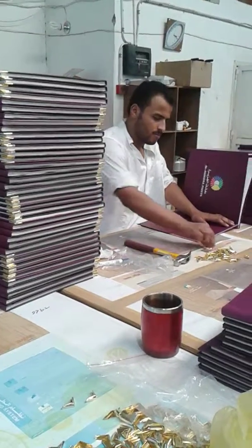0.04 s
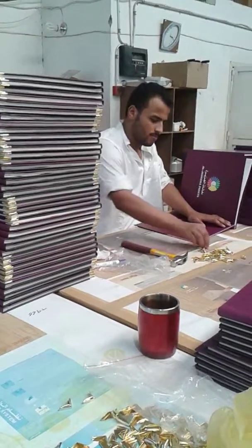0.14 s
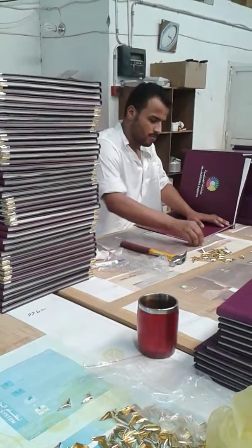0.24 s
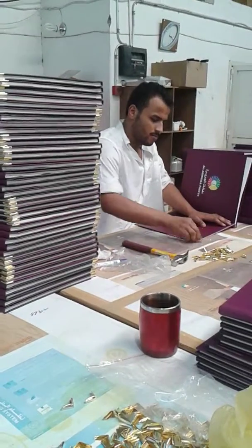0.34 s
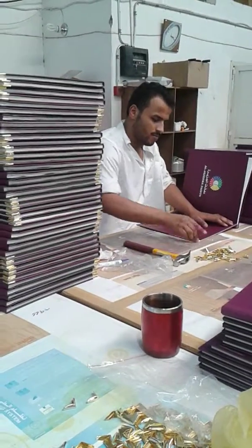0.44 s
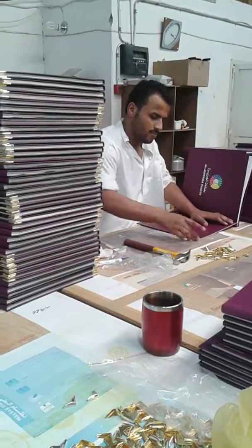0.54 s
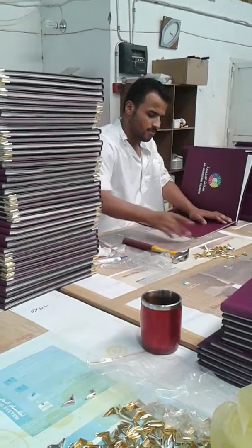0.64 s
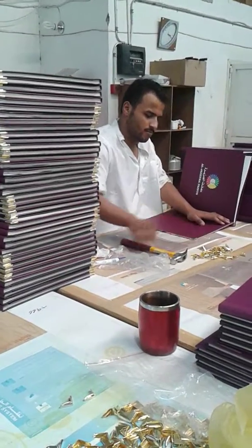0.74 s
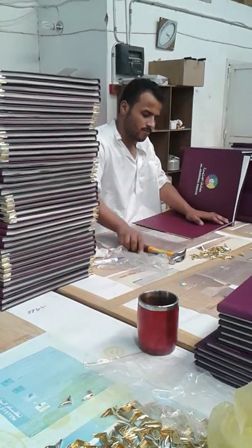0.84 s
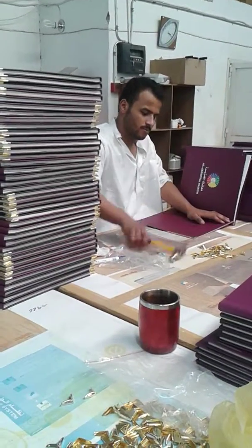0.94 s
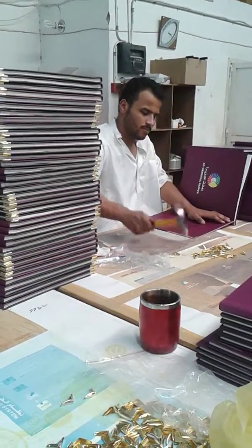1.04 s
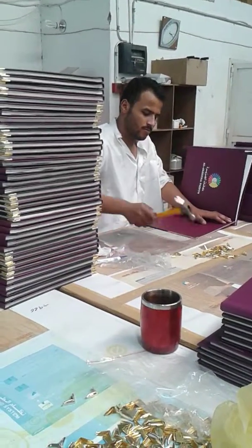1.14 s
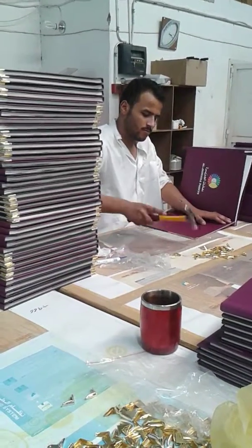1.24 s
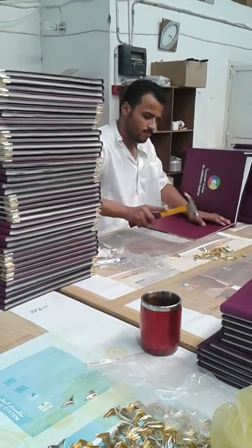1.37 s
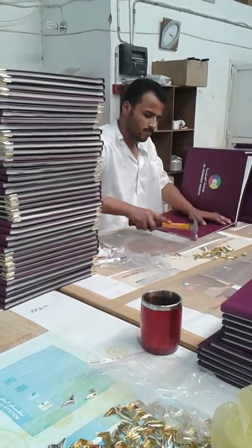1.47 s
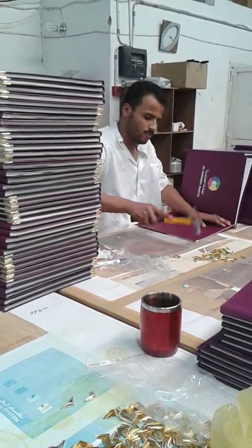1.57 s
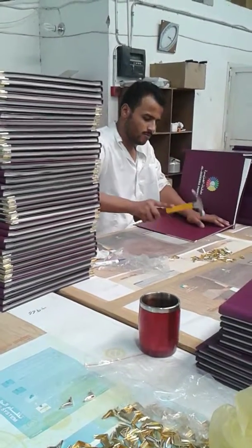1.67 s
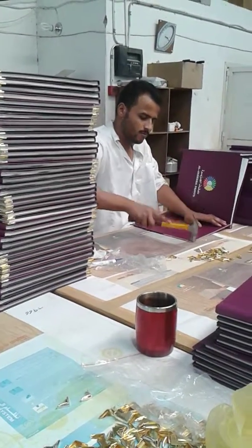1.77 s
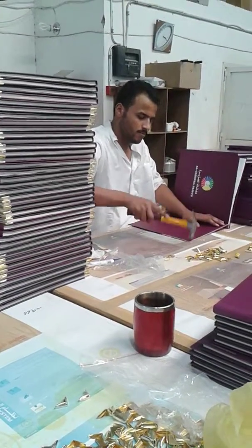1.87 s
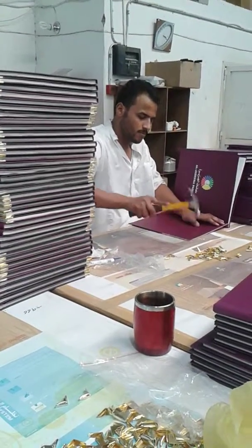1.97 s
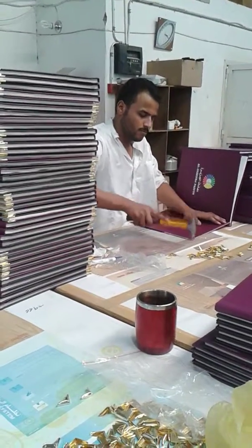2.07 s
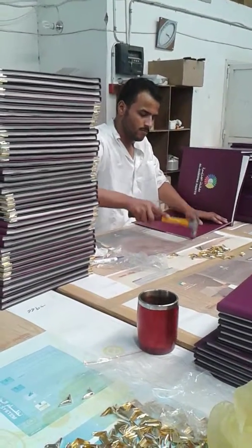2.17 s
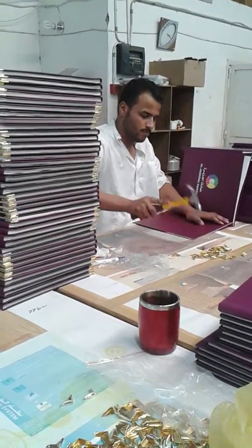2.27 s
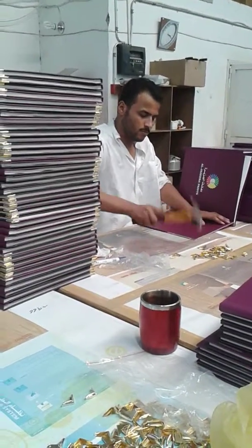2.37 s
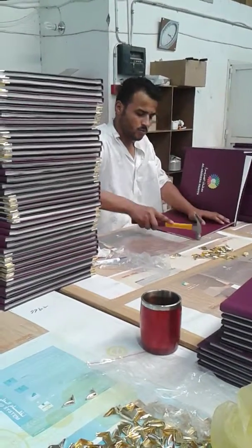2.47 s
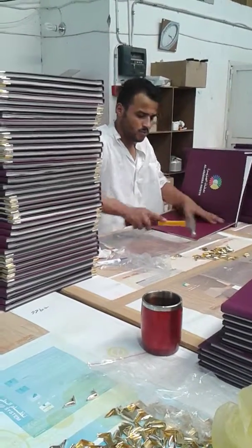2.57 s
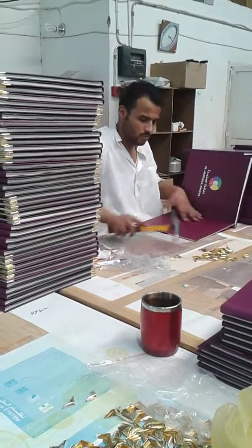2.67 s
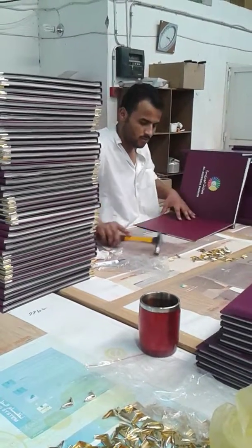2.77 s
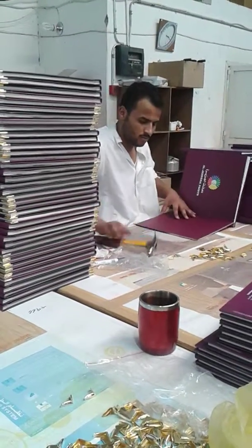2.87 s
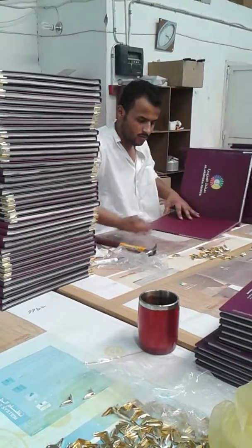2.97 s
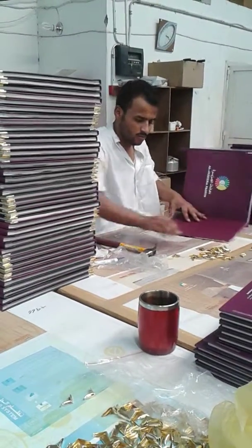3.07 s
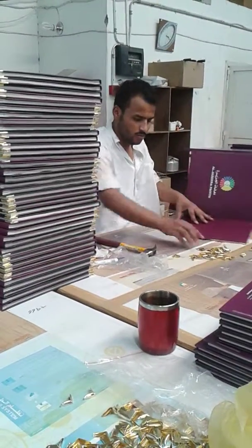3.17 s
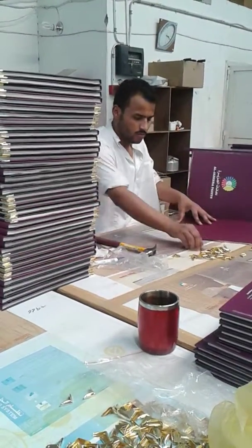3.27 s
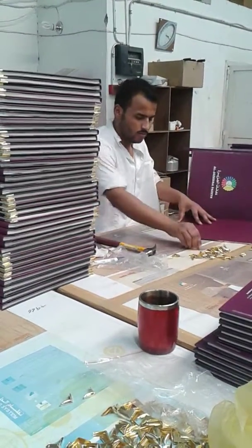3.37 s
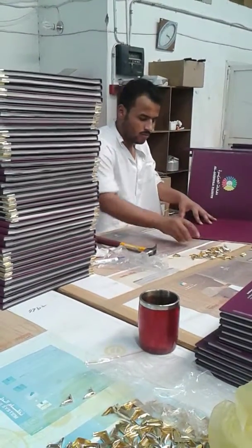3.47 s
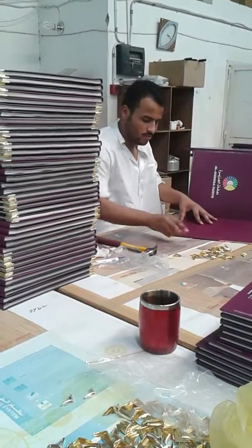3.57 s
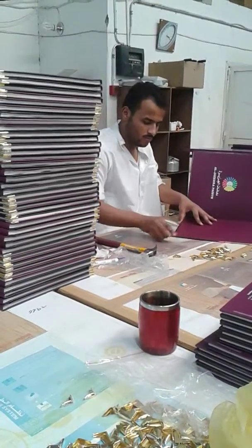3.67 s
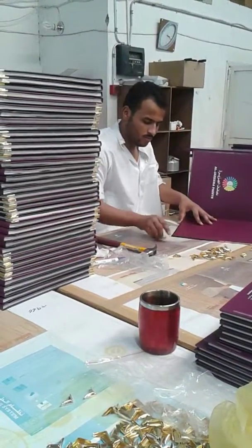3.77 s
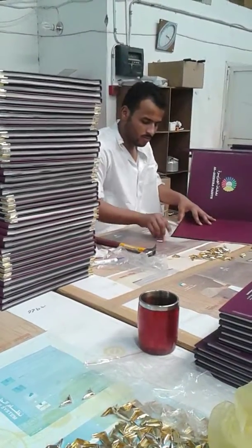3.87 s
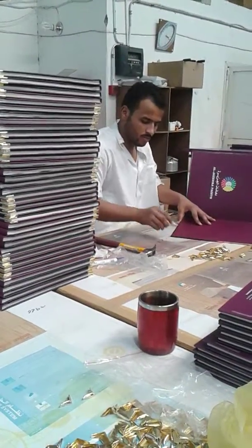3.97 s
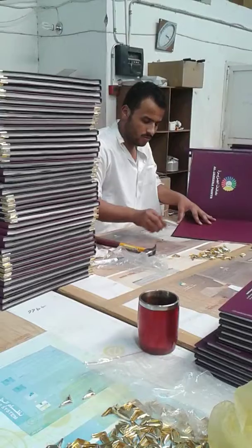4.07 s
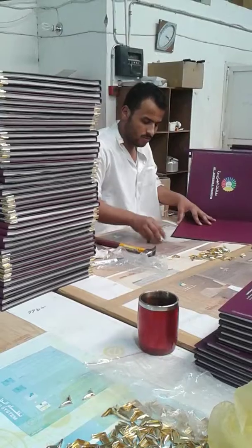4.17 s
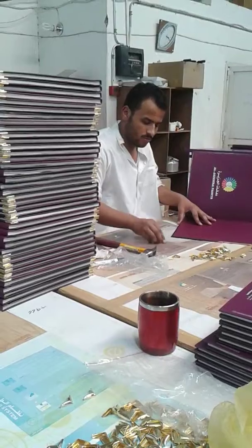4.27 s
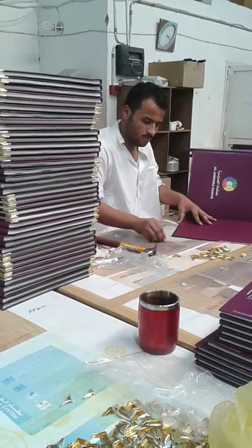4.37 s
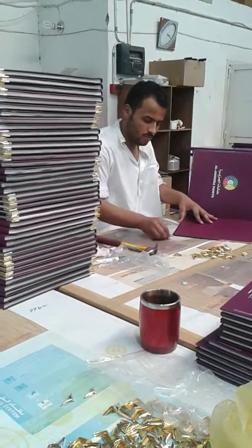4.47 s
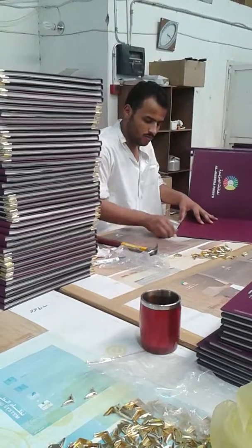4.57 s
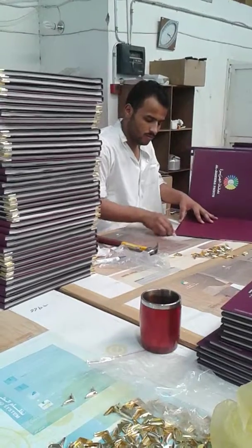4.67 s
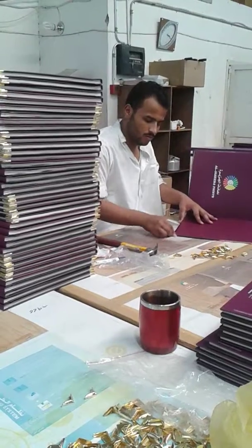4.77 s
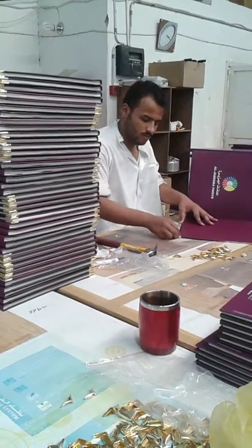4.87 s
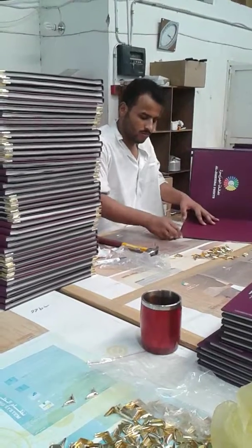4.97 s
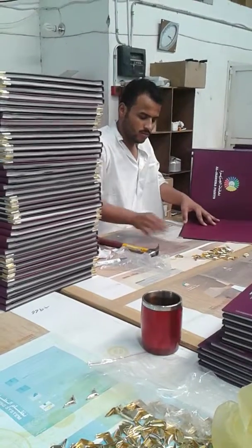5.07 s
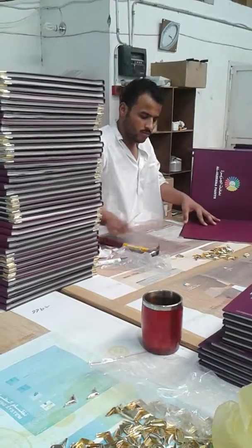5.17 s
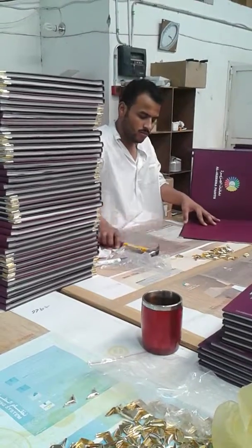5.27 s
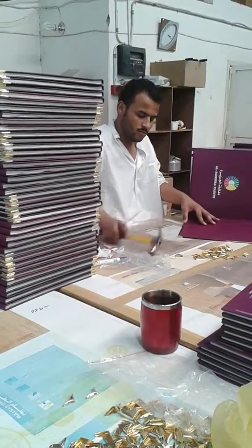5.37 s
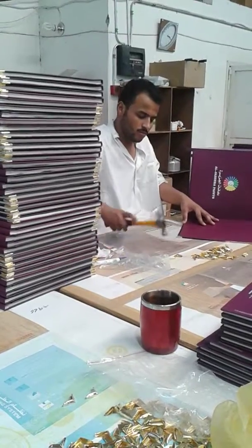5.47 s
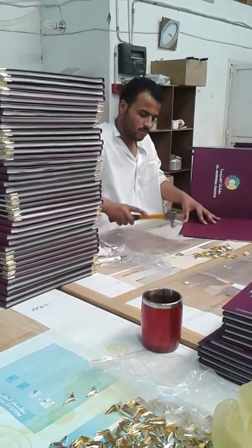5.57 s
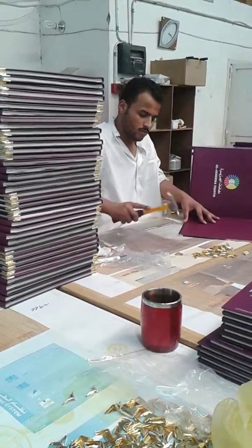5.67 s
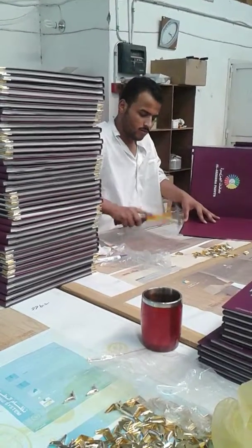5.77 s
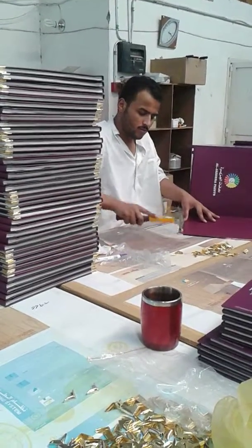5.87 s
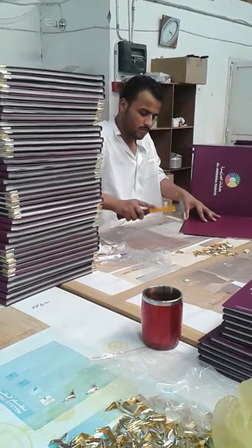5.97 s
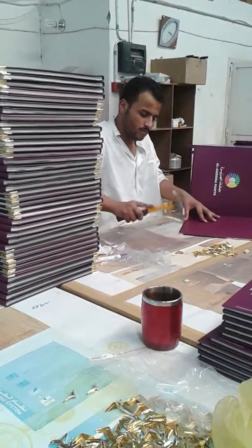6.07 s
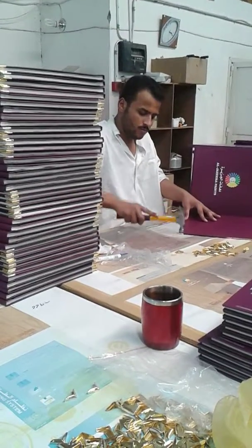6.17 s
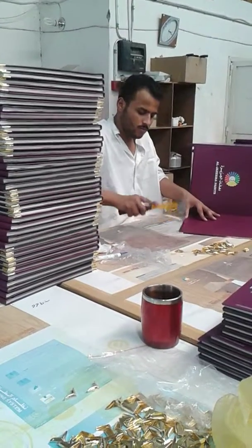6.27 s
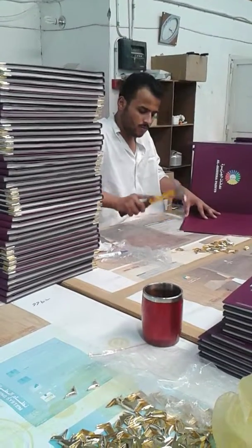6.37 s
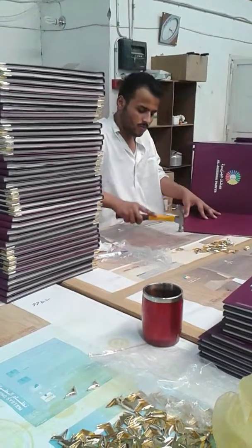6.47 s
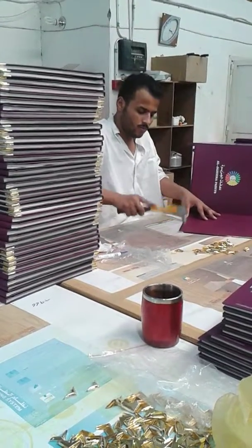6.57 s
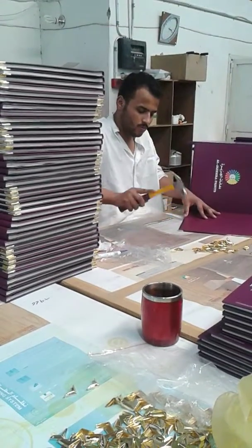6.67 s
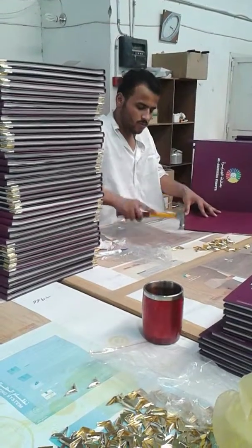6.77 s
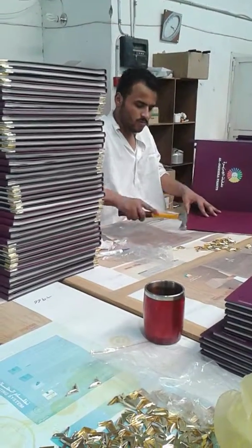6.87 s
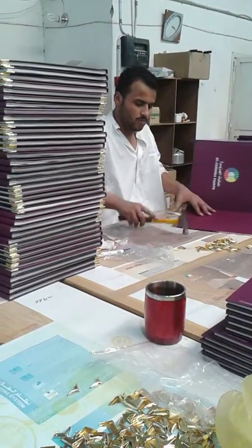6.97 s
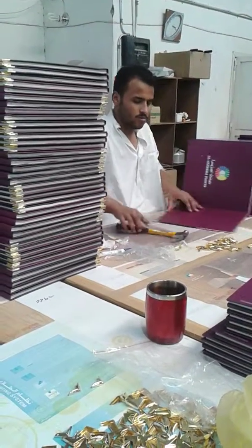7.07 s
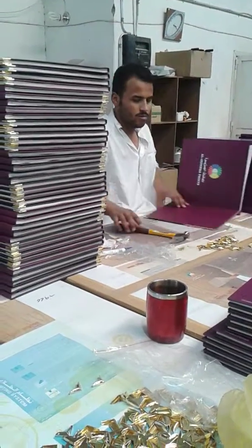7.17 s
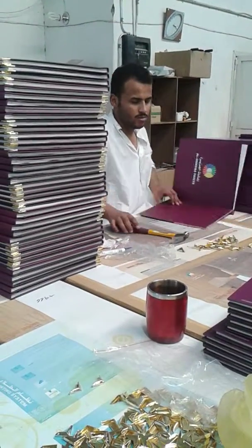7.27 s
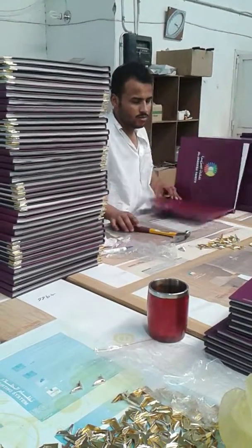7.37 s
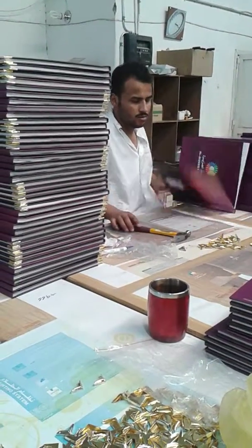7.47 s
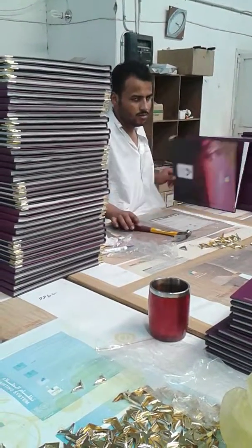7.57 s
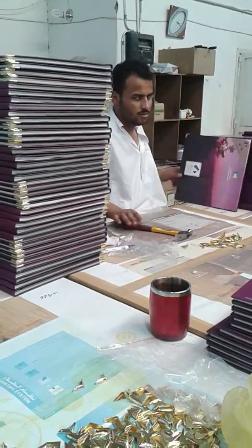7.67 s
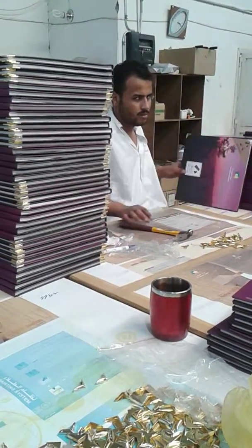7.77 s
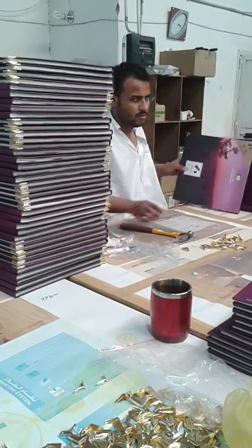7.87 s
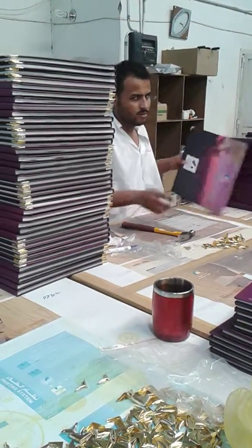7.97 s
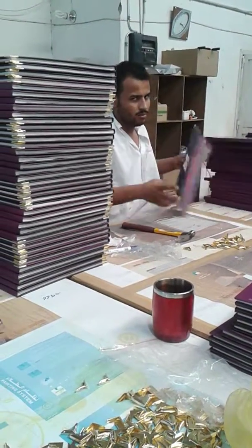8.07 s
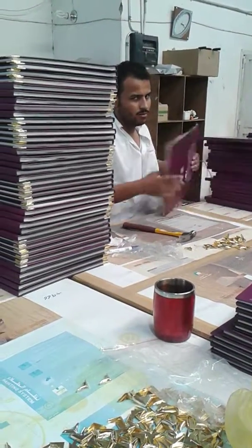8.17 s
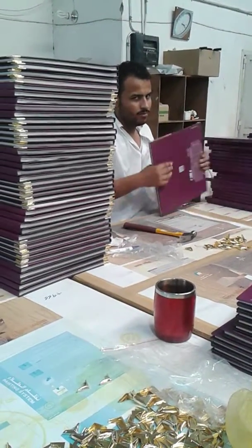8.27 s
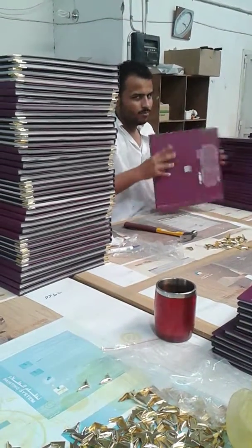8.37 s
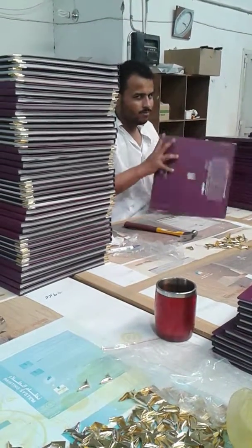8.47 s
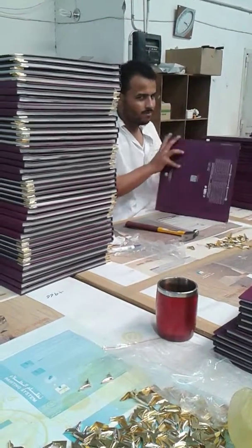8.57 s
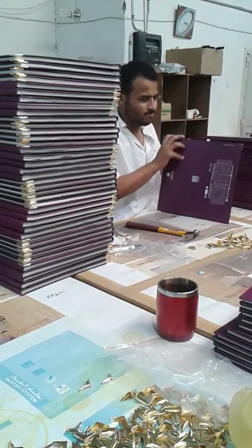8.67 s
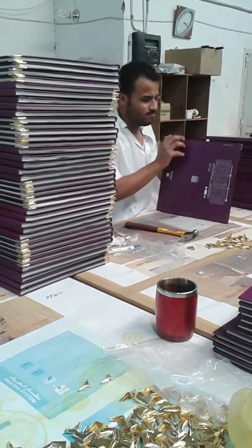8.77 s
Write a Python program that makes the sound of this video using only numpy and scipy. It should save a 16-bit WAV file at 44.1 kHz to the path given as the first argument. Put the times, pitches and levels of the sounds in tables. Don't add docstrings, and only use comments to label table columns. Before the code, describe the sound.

A tool is picked up with a clack and paper rustle, then hammer blows start lightly and get denser as a second hammer joins, with steel cracks, bouncing taps and jingling small metal pieces. A lull leaves whine, hiss and ticking. A second run hits harder, then blows on a thicker, drier pile and sliding card. Live room, close microphone, slightly clipped peaks.

```python
import sys
import numpy as np
from scipy import signal
from scipy.fft import rfft, irfft, next_fast_len
from scipy.io import wavfile
from scipy.ndimage import uniform_filter1d, map_coordinates

SR = 44100
rng = np.random.default_rng(int(sys.argv[2]) if len(sys.argv) > 2 else 0)


def log_audio(samples):
    frames = np.atleast_2d(samples).T
    limited = np.clip(frames, -1, 1)
    pcm = np.round(limited * 32767).astype(np.int16)
    wavfile.write(sys.argv[1], SR, pcm)


def linear_from_db(decibels):
    return 10 ** (np.asarray(decibels, float) / 20)


N = 389403


def unit(x):
    return x / np.sqrt(np.mean(x ** 2) + 1e-20)


def along(points, hz):
    f, v = np.transpose(points)
    return np.interp(np.log(hz + 1), np.log(f + 1), v)


def wobble(rate, size=N):
    return map_coordinates(rng.standard_normal(int(size * rate / SR) + 4), [np.arange(size) * rate / SR])


def filtered(x, response):
    m = next_fast_len(x.shape[-1] + 8192)
    return irfft(rfft(x, m) * response(np.fft.rfftfreq(m, 1 / SR)), m)[..., :x.shape[-1]]


def coloured(x, spectrum):
    return unit(filtered(x, lambda hz: linear_from_db(along(spectrum, hz))))


def resonance(hz, width):
    return lambda f: 1j * f * width / (hz * hz - f * f + 1j * f * width)


def ring(t, hz, db, t60, rise):
    hz, db, t60 = (np.reshape(v, (-1, 1)) for v in (hz, db, t60))
    modes = linear_from_db(db - 60 * t / t60) * np.sin(2 * np.pi * hz * t)
    return np.sum(modes, axis=0) * (1 - np.exp(-t / rise))


def add(track, s, sound):
    track[round(s * SR):][:len(sound)] += sound


# (time [s], slap level [dB], board pitch [Hz],
# lasting boom re slap [dB], steel crack level [dB])
NEAR_BLOWS = [
    (1.533, -3.5, 1110, -9, -38),
    (1.854, -2, 1020, -3, -33),
    (2.153, 4, 1000, -13.5, -16),
    (2.469, 3.5, 1000, -9.5, -9.5),
    (5.864, -1.5, 1007, -10.5, -24),
    (6.19, -1.5, 1132, -16, -27),
    (6.503, 6.5, 813, -18.5, -3.5),
    (6.835, 9, 809, -24, 1),
]
BESIDE_BLOWS = [
    (2.408, -1.5, 922, -6.5, -27),
    (2.786, 5, 932, -13, -1.5),
    (3.107, 5, 934, -8.5, -15),
    (3.453, 7.5, 795, -15.5, -5),
    (3.899, 8, 882, -14.5, 1),
    (4.1, -3, 1230, -10, -7.5),
]
LAID_DOWN = [
    (2.989, -9, 876, -1.5, -19),
    (7.121, -3, 798, -11, -8),
]
PILE_BLOWS = [
    (7.345, 2.5, 1200, -9.5, -9),
    (7.741, 7.5, 970, -14.5, -1),
    (8.499, 5, 1226, -14.5, -2.5),
]


def blows():
    # thud, belly near 400 Hz and board knock [dB re slap]; folders land after [s],
    # damping on landing [dB], room share [dB]; then the level of loose corners thrown up [dB]
    kinds = [(NEAR_BLOWS, (-15.5, -5.5, -11.5, 0.6, -7.5, -2.5), -36.5),
             (BESIDE_BLOWS, (-12, -3.5, -9, 0.062, -11.5, -8), -30),
             (LAID_DOWN, (-28, 1, 0, 2.5, -3, -5), -57),
             (PILE_BLOWS, (-21, -2, -10.5, -0.2, -2.5, -11), -30.5)]
    return sorted((row, place, rattle_db) for rows, place, rattle_db in kinds for row in rows)


# (frequency [Hz], level [dB], t60 [s])
TABLE_AND_STACK_MODES = [(107, -52, 0.36), (126.7, -4.5, 0.76), (156, -7, 0.49), (216.7, -7, 0.37), (258, 6.5, 0.12),
                         (334, 9.5, 0.13), (403.3, 9, 0.093), (434, 0.5, 0.11), (466.7, 1.5, 0.36), (527, 1.5, 0.36),
                         (649.6, 1, 0.47), (776, 8, 0.11), (797.5, -4.5, 0.28), (813, -7, 0.39), (1000, 16, 0.2),
               (1084, 16.5, 0.18), (1200, -25, 0.17), (1200, -1, 0.24), (1579, -17, 0.044),
               (2000, -36, 0.079)]
# (frequency [Hz], density [dB per Hz])
CHATTER_SPECTRUM = [(150, -40), (350, 13.5), (700, 5), (1300, 3), (2200, -10), (4000, -51)]
CHATTER_DB, CHATTER_PER_SLAP, CHATTER_PER_CRACK = -17, 0.26, 0.26
BOARD_YIELDS = 0.1
BEND_S = 0.0015
RETURN_DB = -6.5


def hammers():
    out, t = np.zeros(N + 2 * SR), np.arange(SR // 3) / SR
    hz, level, t60 = np.transpose(TABLE_AND_STACK_MODES)
    for (s, db, board_hz, boom_db, crack_db), place, _ in blows():
        thud_db, belly_db, board_db, lands, damp_db, room_db = place
        chatter_db = CHATTER_DB + CHATTER_PER_SLAP * db + CHATTER_PER_CRACK * crack_db
        board_db = board_db - BOARD_YIELDS * db
        landed = linear_from_db(damp_db / (1 + np.exp((lands - t) / 0.0015)))
        colour = along([(120, thud_db), (280, -2.5), (400, belly_db), (560, -7.5), (1000, board_db - 10.5)], hz)
        level_here = level + colour

        spot = rng.normal(0, 1, (3, len(hz)))
        boom_level = level_here + 3 * spot[0] + boom_db + 1.0 - 9 * (hz > 600) - 4 * (hz > 440)
        boom = ring(t, hz * (1 + 0.012 * spot[1]), boom_level, t60, rise=0.0019)
        slap = ring(t, hz * 1.048, level_here + 4 * spot[2], 0.18 * t60, rise=0.0011)
        knock_hz = board_hz * np.array([.72, 1, 1.28, 1.65, 2.2])
        knock_db = board_db + np.array([1.5, 8, 4.0, 5, 0])
        knock = ring(t, knock_hz, knock_db, [0.024, 0.04, 0.029, 0.016, 0.017], rise=0.00037)

        grains = rng.standard_normal(len(t)) * linear_from_db(3.5 * wobble(70, size=len(t)))
        chatter = coloured(grains, CHATTER_SPECTRUM) * linear_from_db(chatter_db + 5 - 60 * t / 0.46)
        chatter *= 1 - np.exp(-t / 0.0005)
        blow = linear_from_db(db - 0.5) * (boom * landed + slap + knock) + chatter * landed
        blow = filtered(blow, lambda f: np.exp(-4j * np.pi * BEND_S * np.sqrt(1000 * f)))
        add(out, s - .0005, blow)
        wet = room(blow)
        add(out, s, linear_from_db(room_db + RETURN_DB) * wet * np.linalg.norm(blow) / np.linalg.norm(wet))
    return out[:N]


# (frequency [Hz], width [Hz], level [dB])
CORNER_RESONANCES = [(2220, 1400, -2), (4000, 310, 14), (5070, 750, 8.5), (8200, 930, 1), (10000, 920, 0.5),
                     (12400, 1000, 0.5), (14200, 1300, 0.5)]
RATTLE_GROWS = 0.31
RATTLE_AFTER_S, LONGER_S = 0.051, 0.0022


def steel():
    out, effort, t = np.zeros(N + 2 * SR), np.zeros(N + SR), np.arange(SR // 4) / SR
    for (s, db, *_, crack_db), _, rattle_db in blows():
        grit = uniform_filter1d(rng.standard_normal(len(t)), size=7) * linear_from_db(-60 * t / 0.027 + 20.5)
        grit *= 1 - np.exp(-t / 0.0014)
        clink = ring(t, [2500, 3900, 5600], [-4, 0, -10], [.025, .015, .01], rise=0.00032)
        crack = linear_from_db(crack_db - 10) * (clink + grit)
        add(out, s, crack)
        add(out, s, room(crack))

        flight = t / (RATTLE_AFTER_S + LONGER_S * db)
        landing = flight ** 2.45 * np.exp(3.6 * (1 - flight))
        add(effort, s, linear_from_db(rattle_db + RATTLE_GROWS * db) * landing)
    grains = rng.standard_normal(N) * linear_from_db(1.5 * wobble(300))

    def metal(f):
        return sum((-1) ** k * linear_from_db(db) * resonance(hz, width)(f)
                   for k, (hz, width, db) in enumerate(CORNER_RESONANCES))

    return out[:N] + effort[:N] * unit(filtered(grains, metal))


# (time [s], peak level [dB], board pitch [Hz])
HEAD_REBOUNDS = [
    (1.936, -6.5, 1190),
    (2.257, 2, 1010),
    (2.551, -2, 1210),
    (3.03, -11, 1274),
    (5.964, 4.5, 1240),
    (6.288, 6, 1200),
    (6.638, 11.5, 1233),
    (6.978, 12, 1200),
    (6.985, 1.5, 1145),
]
REBOUND_TABLE_HZ, REBOUND_TABLE_DB = 382, -12
# (time [s], peak level [dB], board pitch [Hz], table pitch [Hz], table re peak [dB])
FOLDER_LANDINGS = [(1.577, -6.5, 660, 268, 5.5), (1.605, -7.5, 1180, 233, 3), (2.828, -1, 897, 334, 5.5),
                   (2.89, -18, 590, 358, 9), (3.151, -2, 614, 444, -1), (3.497, -3, 670, 472, -3),
                   (3.635, -17, 666, 468, -1), (4.023, -8, 690, 350, 4), (6.243, -17, 830, 258, 13),
                   (7.169, -2.5, 700, 342, 1.5), (7.779, 0, 644, 345, -9), (7.841, -5, 590, 328, 3),
                   (8.552, -9, 940, 290, 8)]
# (time [s], peak level [dB], board pitch [Hz], table pitch [Hz], table re peak [dB])
HANDLING_KNOCKS = [(0.604, 6, 1030, 173, -20), (0.644, -17, 910, 340, 3.5), (0.679, -3.5, 770, 247, -10),
                   (0.692, -17, 623, 378, 1), (0.721, -19, 1150, 346, -2), (0.727, -34.5, 704, 130, 12),
                   (0.852, -17.5, 760, 338, -1.5), (5.299, -12.5, 675, 370, 2), (5.302, -16, 1050, 360, -3),
                   (7.09, -15, 650, 333, 1), (8.131, -13.5, 820, 249, -1.5), (4.103, 10.5, 1237, 424, -18)]
TAP_T60_S, TAP_SHORTENS, TAP_PITCH_LAW = 0.018, 0.077, 0.69


def taps():
    out, t = np.zeros(N + 2 * SR), np.arange(SR // 5) / SR
    rebounds = [(*row, REBOUND_TABLE_HZ, REBOUND_TABLE_DB) for row in HEAD_REBOUNDS]
    for s, db, note_hz, table_hz, table_db in rebounds + FOLDER_LANDINGS + HANDLING_KNOCKS:
        note_t60 = TAP_T60_S * linear_from_db(-TAP_SHORTENS * db) * (1000 / note_hz) ** TAP_PITCH_LAW
        note = ring(t, note_hz * np.array([.84, 1, 1.14, 1.5]), [-1, 4.5, -3.0, -12], note_t60, rise=0.0041)
        wood_db = table_db + np.array([-9, -1.5, -9])
        wood = ring(t, table_hz * np.array([.8, 1, 1.22]), wood_db, 3.2 * note_t60, rise=0.0029)
        add(out, s, linear_from_db(db) * (note + wood))
        add(out, s, linear_from_db(db + 2) * room(note + wood))
    return out[:N]


# (time [s], peak level [dB], pitch [Hz])
CORNER_CLICKS = [
    (2.437, -13, 3930),
    (2.4965, -37, 3960),
    (5.9434, -11, 3080),
    (5.955, -18, 3700),
    (6.982, -18, 3370),
    (7.3861, -14, 4700),
    (7.7955, -7, 3600),
    (8.129, -16, 3200),
]
TICK_FIRST_S, TICK_EVERY_S = 0.0957, 0.86665
TICK_DB, TICK_HZ = -20, 3670


def clicks():
    out, t = np.zeros(N + SR), np.arange(SR // 20) / SR
    ticks = [(s, TICK_DB, TICK_HZ) for s in np.arange(TICK_FIRST_S, N / SR, TICK_EVERY_S)]
    for s, db, hz in CORNER_CLICKS + ticks:
        spit = rng.standard_normal(len(t)) * linear_from_db(-60 * t / 0.046) * (1 - np.exp(-t / 0.0013))
        tone = filtered(spit, lambda f: resonance(hz, .45 * hz)(f) + linear_from_db(-32) * resonance(12500, 5000)(f))
        add(out, s, linear_from_db(db - 0.5) * tone / np.abs(tone).max())
    return out[:N]


# (time [s], fall t60 [s], level [dB], centre [Hz])
SLIDES = [
    (.62, 0.43, -23, 900),
    (0.659, 0.56, -27, 2800),
    (0.7, 1, -36.5, 600),
    (.75, 0.63, -30, 1500),
    (5.29, 0.46, -30, 4000),
    (7.7, 0.43, -21, 700),
]
# (time [s], level [dB], centre [Hz])
FOLDER_SCUFFS = [
    (1.836, -22, 597),
    (3.88, -11.5, 493),
    (4.085, -12, 700),
    (8.13, -22, 604),
]
SLIDE_RISE_S, SCUFF_RISE_S, SCUFF_T60_S = 0.027, 0.0045, 0.11


def rustle():
    out, t = np.zeros(N + SR), np.arange(SR // 2) / SR
    strokes = [(SLIDE_RISE_S, *row) for row in SLIDES]
    strokes += [(SCUFF_RISE_S, s, SCUFF_T60_S, db, hz) for s, db, hz in FOLDER_SCUFFS]
    for rise, s, t60, db, hz in strokes:
        grains = rng.standard_normal(len(t)) * linear_from_db(5 * wobble(120, size=len(t)))
        scrape = filtered(grains, lambda f: resonance(hz, hz)(f) ** 2)
        add(out, s, unit(scrape) * linear_from_db(db - 60 * t / t60) * (1 - np.exp(-t / rise)))
    return out[:N]


# (time [s], tooth tone level [dB])
MACHINE_LOAD = [(0, -44), (.7, -44.5), (1.5, -41.5), (2.5, -43.5), (3.5, -38), (4.7, -42), (5.3, -36.5),
                (6.2, -35), (7.4, -37.5), (8, -33), (8.83, -39)]
# (frequency [Hz], peak level [dB])
MACHINE_TONES = [(565.2, -42), (1405, -49.5), (1486, -49), (3009, -55), (3182, -38), (3241, -62),
                 (3302, -47), (3332, -44), (3359, -54), (3451, -41), (3537, -52), (3688, -71), (4156, -48),
                 (5658, -49.5), (6013, -47), (6191, -52), (6277, -47)]
# (frequency [Hz], density [dB per Hz])
AIR_SPECTRUM = [(30, -78), (60, -13), (150, -10), (330, -4.5), (560, -9), (900, -10.5), (1450, -11.5),
                (2300, -15.5), (2900, -5.5), (3600, -2.5), (5300, -14), (6200, -10.5), (7400, -15),
                (15000, -30)]
# (frequency [Hz], density [dB per Hz])
TURN_SPECTRUM = [(2300, -101), (2900, 24.5), (3400, 12.5), (4200, 3), (4900, -38), (5500, -25), (6200, -5),
                 (7500, -18), (9000, -61)]
SHAFT_HZ, TOOTH_HZ = 29.482, 2830.3
HISS_DB, HISS_GROWS = -35, 0.06


def machine():
    s, tooth_db = np.transpose(MACHINE_LOAD)
    hiss_db = HISS_DB + HISS_GROWS * (tooth_db - tooth_db.mean())
    clock = np.arange(N) / SR
    spun = clock + np.cumsum(0.000449 * wobble(1.5)) / SR
    tooth_level = linear_from_db(np.interp(clock, s, tooth_db) + 3.5 + 1.9 * wobble(8))
    tones = tooth_level * np.sin(2 * np.pi * TOOTH_HZ * spun)
    for hz, db in MACHINE_TONES:
        if hz > 2500:
            hz = round(hz / SHAFT_HZ) * SHAFT_HZ
        tones += linear_from_db(db + 0.34 * wobble(16)) * np.sin(2 * np.pi * (hz * spun + rng.random()))

    place = spun * SHAFT_HZ % 1
    pattern = map_coordinates(rng.standard_normal(1500), [place * 1500], mode="grid-wrap")

    z = signal.stft(rng.standard_normal(N), nperseg=512)[2]
    field = uniform_filter1d(rng.standard_normal(z.shape), size=5, axis=0)
    field = uniform_filter1d(field, size=12, axis=1)
    air = signal.istft(z * linear_from_db(1.27 * unit(field)), nperseg=512)[1][:N]
    level = linear_from_db(np.interp(clock, s, hiss_db) + 0.86 * wobble(9))
    noise = linear_from_db(4) * coloured(air, AIR_SPECTRUM) + linear_from_db(-9.5) * coloured(pattern, TURN_SPECTRUM)
    return tones + level * noise


# (frequency [Hz], t60 [s])
ROOM_T60 = [(80, 0.79), (300, 0.66), (1500, 1), (4000, 0.88), (10000, 0.33)]
# (frequency [Hz], level [dB])
WALL_RETURN = [(100, -8.5), (330, -9.5), (700, -13.5), (1300, -21), (2500, -11), (6000, -43)]


def room(sound):
    hz, t, z = signal.stft(rng.standard_normal(SR // 2), SR, nperseg=256)
    tail = signal.istft(z * linear_from_db(-60 * t / along(ROOM_T60, hz)[:, None]), SR, nperseg=256)[1]
    tail = filtered(tail / np.linalg.norm(tail), lambda f: linear_from_db(along(WALL_RETURN, f)))
    return signal.fftconvolve(np.pad(sound, (500, 0)), tail)


def scene():
    return (hammers() + steel() + taps() + clicks() + rustle() + machine())[None]


def roll_off(x):
    return signal.sosfilt(signal.butter(12, 16340, fs=SR, output="sos"), x)


LOW_HZ, TOP_HZ = 102.6, 15030
OUTPUT_TOP_HZ = 16100


def record(dry):
    heard = filtered(dry, lambda hz: (1j * hz / (LOW_HZ + 1j * hz)) ** 2 * (hz < TOP_HZ))
    leak = 1 / (.06 * SR)
    loud = signal.lfilter([leak], [1, leak - 1], heard ** 2)
    heard = heard / (1 + np.abs(loud) / 0.81) ** 0.29
    top, hard = .7, 9
    clipped = heard / (1 + np.abs(heard / top) ** hard) ** (1 / hard)
    mix = filtered(clipped, lambda hz: 1 / (1 + (hz / OUTPUT_TOP_HZ) ** 40))
    return roll_off(mix)


dry = scene()
out = record(dry)
log_audio(out)
```